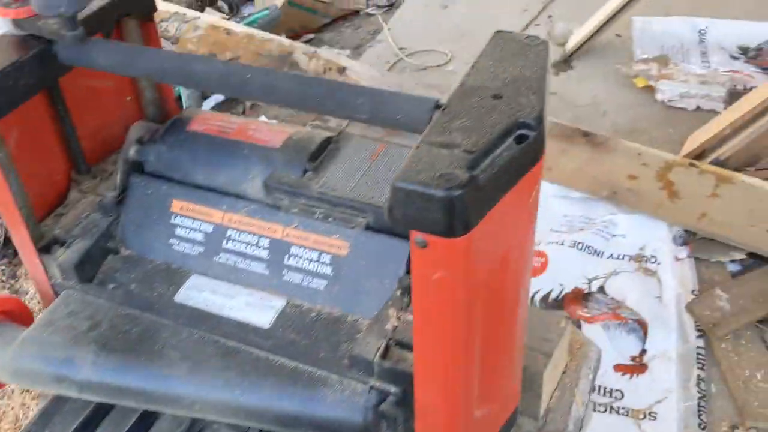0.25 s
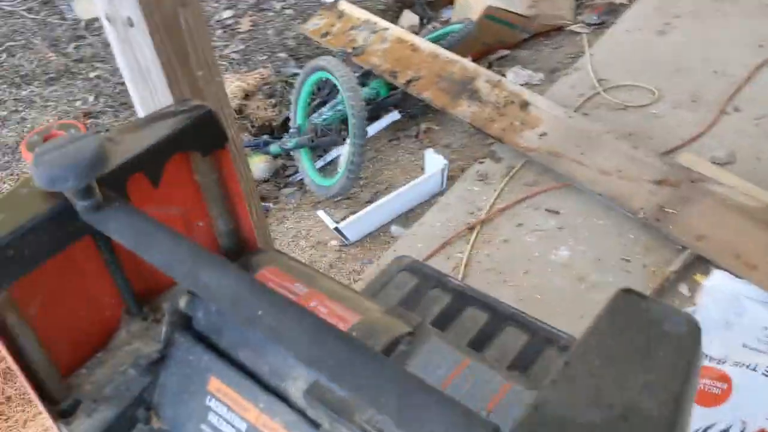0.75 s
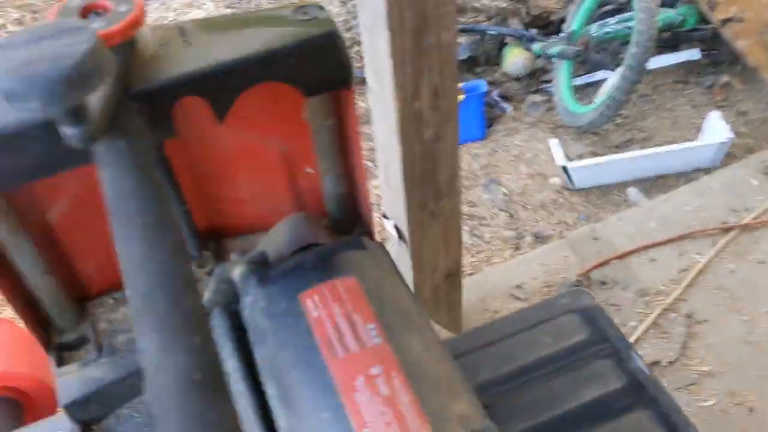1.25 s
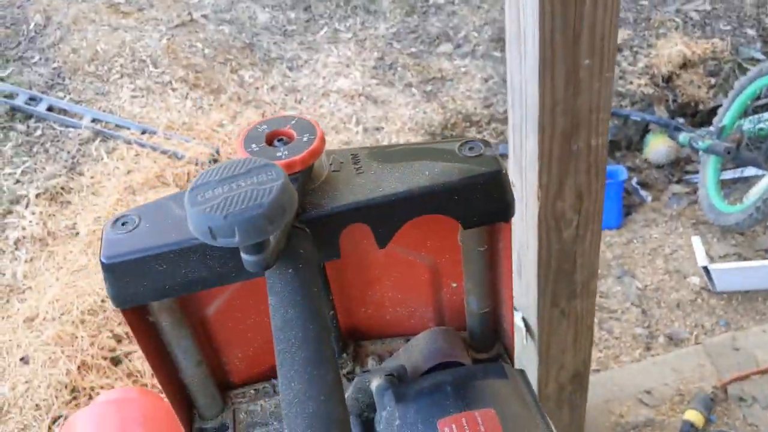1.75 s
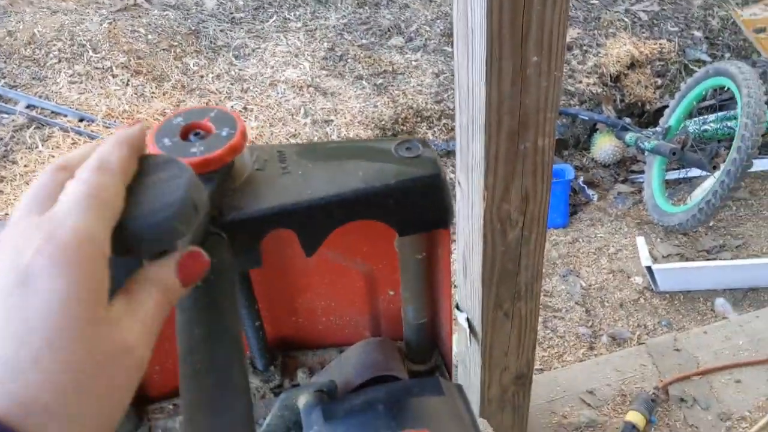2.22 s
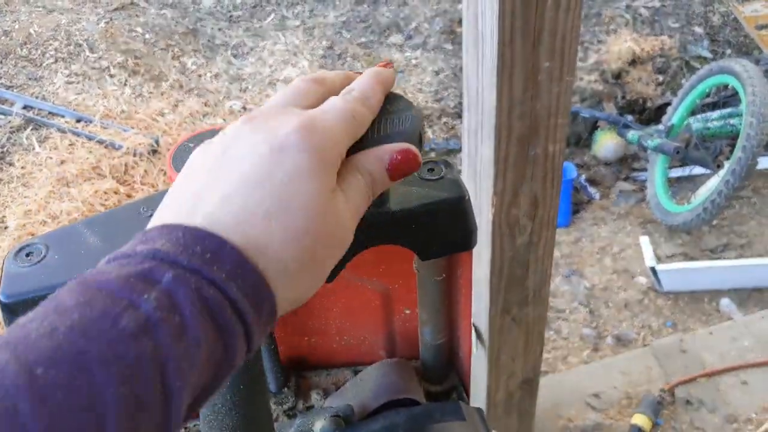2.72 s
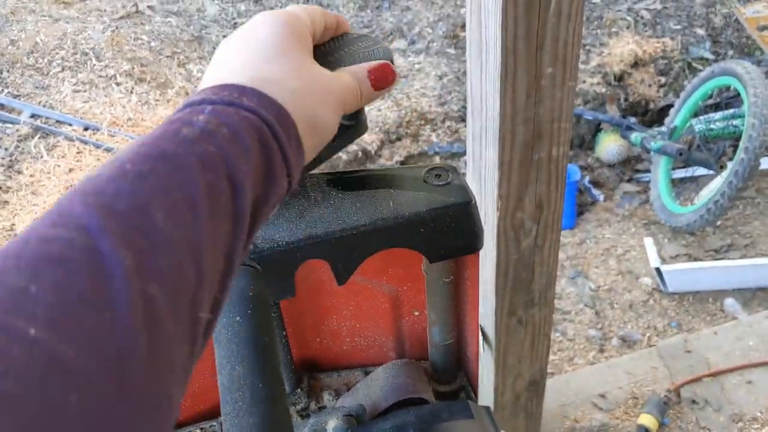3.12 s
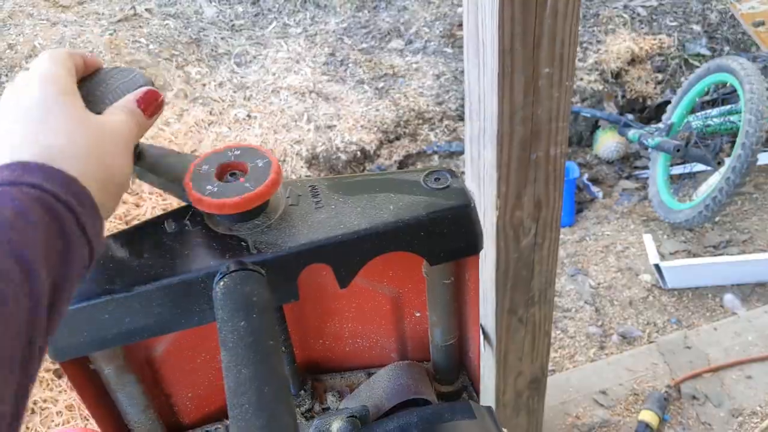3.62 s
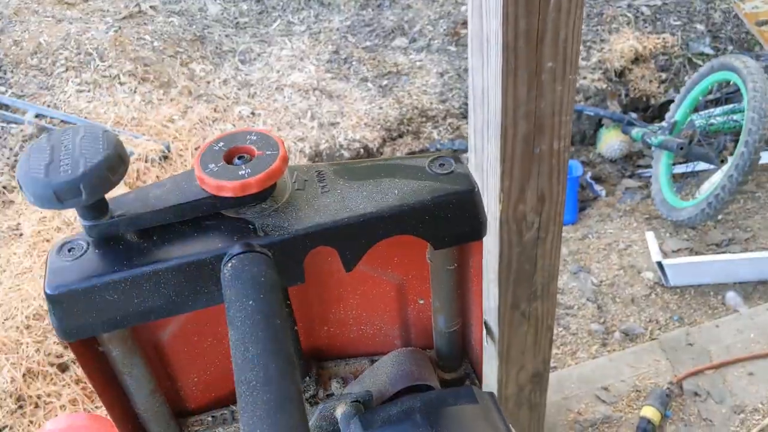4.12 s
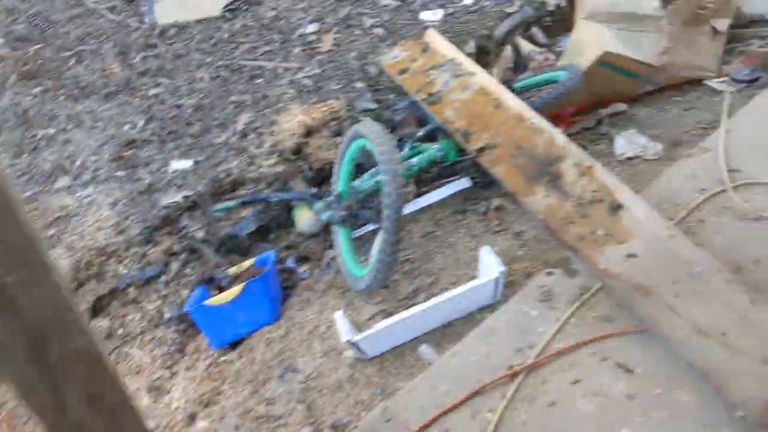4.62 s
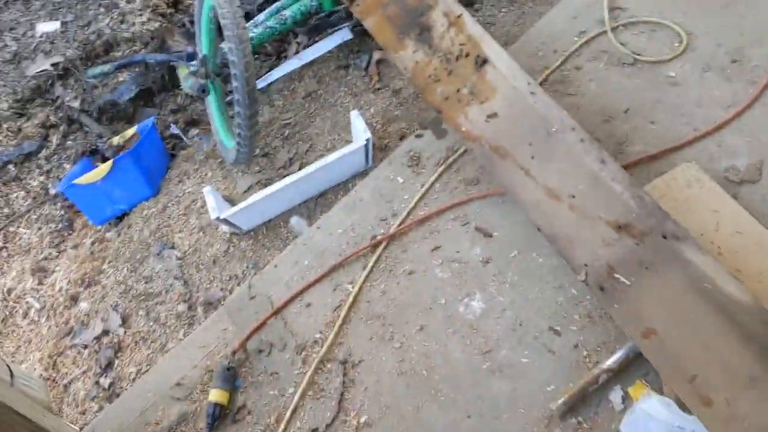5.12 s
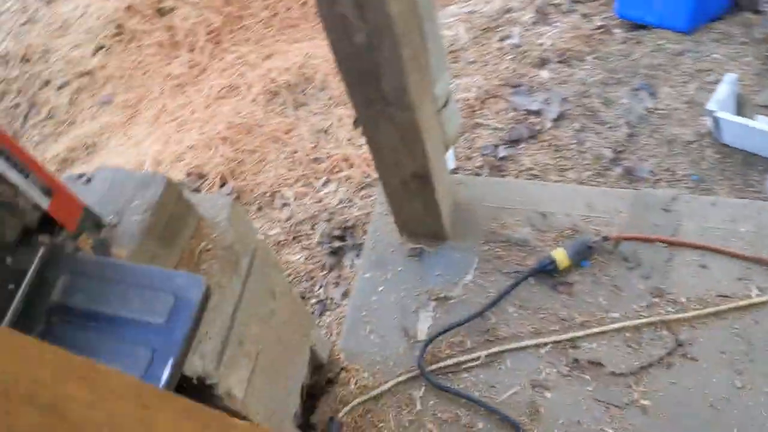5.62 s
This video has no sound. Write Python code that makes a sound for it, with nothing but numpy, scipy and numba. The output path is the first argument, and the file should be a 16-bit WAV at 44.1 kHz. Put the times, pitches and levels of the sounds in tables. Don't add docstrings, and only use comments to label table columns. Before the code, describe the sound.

A benchtop planer idles continuously outdoors, close to a handheld phone in stereo. A low chopping drone, electric whine and broad fan roar begin together; the airy hiss brightens as the phone swings round, grows fuller when it leans in, then the drone thins as it turns away, with soft low wind bumps.

```python
import sys
import numpy as np
from scipy import signal
from scipy.fft import rfft, irfft, next_fast_len
from scipy.io import wavfile
from scipy.ndimage import uniform_filter1d
from numba import njit

SR = 44100
rng = np.random.default_rng(int(sys.argv[2]) if len(sys.argv) > 2 else 0)


def master_out(mix):
    frames = np.transpose(np.atleast_2d(mix))
    ceiling = np.clip(frames, -1, 1)
    pcm = np.round(ceiling * 32767).astype(np.int16)
    wavfile.write(sys.argv[1], SR, pcm)


def ratio_of_db(decibels):
    return 10 ** (np.asarray(decibels, float) / 20)


N = 258426
HOP = 32
STEPS = N // HOP + 2
SIDES = np.array([[1], [-1]])


def curves(table):
    s, *columns = np.transpose(table)
    return [np.interp(np.arange(STEPS) * HOP / SR, s, column) for column in columns]


def fine(x):
    ramp = x[..., :-1, None] + np.diff(x)[..., None] * np.arange(HOP) / HOP
    return ramp.reshape(*x.shape[:-1], -1)[..., :N]


def over_hz(table, hz):
    f, value = np.transpose(table)
    return np.interp(np.log(hz + 1), np.log(f + 1), value)


def unit(x):
    return x / np.sqrt(np.mean(x ** 2))


def walk(rate):
    hold = int(SR / HOP / rate)
    levels = np.repeat(rng.standard_normal(STEPS // hold + 1), hold)[:STEPS]
    return 1.18 * uniform_filter1d(uniform_filter1d(levels, hold), hold)


def swells(rows):
    t = np.arange(STEPS) * HOP / SR
    return sum(db * np.exp(-(2 * (t - s) / length) ** 2) for s, length, db in rows)


# (start [s], end [s])
TURNS = [
    (.44, .52),
    (.92, 1.08),
    (2.2, 2.6),
    (4.55, 4.84),
]


def posed(values):
    held = np.repeat(values, 2)[1:-1]
    return curves(list(zip(np.ravel(TURNS), held)))[0]


# (frequency [Hz], likeness [0-1])
LIKENESS = [(60, 0.2), (130, 0.85), (290, 1), (640, 0.93), (1400, 0.34), (2500, 0.76), (4000, 0.13),
            (8000, 0.12), (15000, 0)]
# (frequency [Hz], left lead [rad])
LEAD = [(0, -0.5), (690, 1), (1210, 0.88), (1890, 0.2), (2760, 4.5), (3360, 8.5), (3620, 9), (4390, 8),
        (5600, 12.5), (6550, 15), (9220, 18.5), (10800, 24.5), (14100, 34), (15400, 17)]


def port_noise(lead=None):
    size = next_fast_len(N)
    hz = np.fft.rfftfreq(size, 1 / SR)
    shared, *own = rfft(rng.standard_normal((3, size)).astype(np.float32))
    like = np.clip(over_hz(LIKENESS, hz), 0, 1)
    if lead is None:
        lead = np.interp(hz, *np.transpose(LEAD))
    together = np.sqrt(like) * shared * np.exp(.5j * lead * SIDES)
    return hz, together + np.sqrt(1 - like) * np.array(own)


WIND_HEARD_DB = (-68, -65, -60.5, -59.5, -76)
# (time [s], length [s], rise [dB])
GUSTS = [(.07, 0.064, 0), (1.3, .25, 3), (2.28, 0.072, 10), (2.39, .08, 7), (2.61, 0.052, 5),
         (3.44, .08, 7), (5.45, .07, 18), (5.86, .1, 18)]


def wind():
    hz, noise = port_noise()
    top_hz, low_hz, gain_db = 100, 30, 3.5
    rumble = irfft(noise / (1 + (hz / top_hz) ** 2) / (1 + low_hz / (hz + 1)))[:, :N]
    return unit(rumble) * fine(ratio_of_db(posed(WIND_HEARD_DB) + swells(GUSTS) + gain_db))


# (frequency [Hz], width [Hz], level [dB])
PANELS = [(358, 24, -55), (451, 23, -49.5), (559, 17, -54), (720, 14, -51)]


def panels():
    hz, noise = port_noise()
    modes = 0
    for centre, width, db in PANELS:
        modes = modes + ratio_of_db(db) / np.sqrt(width) / (1 + (2 * (hz - centre) / width) ** 2)
    pan_db = 4.0
    return irfft(noise * modes)[:, :N] * np.sqrt(SR / 1.6) * ratio_of_db(pan_db / 2 * SIDES)


# (frequency [Hz], left minus right [dB])
BALANCE_DB = [(60, 1), (110, -1), (200, 2.5), (380, 2), (700, 10), (1290, 0), (2380, -6), (4400, -1),
              (8120, 1.5), (15000, -6)]
# (frequency [Hz], # width [Hz], level [dB])
VENTS = [(4400, 490, -45), (5900, 600, -44.5), (10100, 700, -44), (5520, 460, -46.5), (10400, 540, -50),
         (9100, 450, -52), (9200, 1000, -50), (5800, 500, -48.5), (6100, 560, -44), (9500, 1900, -54),
         (11000, 4100, -38.5), (2670, 180, -42), (2080, 410, -36), (2850, 630, -32.5), (2490, 450, -37),
         (2510, 220, -41), (3670, 47, -51.5)]
# (start [s], end [s])
VENT_OPEN = [(1.15, 4.45), (.52, 1.15), (.78, 1.26), (4.75, 5.25), (3.3, 3.53), (3.5, 3.9), (1.3, 1.82),
             (2.45, 2.85), (4.38, 4.58), (2, 4.75), (.58, .72), (1.44, 1.73), (0, .21), (.17, .76),
             (.45, .77), (4.58, 5.15), (0, 4.7)]


def vents():
    hz, noise = port_noise(lead=1.8)
    noise = (noise * ratio_of_db(over_hz(BALANCE_DB, hz) / 2 * SIDES)).astype(np.complex64)
    fade_s, flicker_db = .05, 1.5
    out = 0
    for (start, end), (centre, width, db) in zip(VENT_OPEN, VENTS):
        hump = 1 / (1 + (2 * (hz - centre) / width) ** 2)
        band = irfft((noise * hump).astype(np.complex64))[:, :N] * np.sqrt(SR / width)
        gate = curves([(start - fade_s, 0), (start + fade_s, 1), (end - fade_s, 1), (end + fade_s, 0)])[0]
        out = out + band * fine(gate * ratio_of_db(db + flicker_db * walk(12)))
    return out


# (frequency [Hz], level [dB per Hz])
AIR_COLOUR = [(100, -81.5), (160, -68.5), (250, -58.5), (420, -53), (600, -61.5), (800, -55.5),
              (1200, -55.5), (1500, -60.5), (2200, -56), (3200, -59), (4400, -61.5), (7200, -66),
              (9500, -64), (15500, -74.5)]
AIR_CENTRES_HZ = (200, 1400, 6000, 13000)
AIR_HEARD_DB = [(-2.2, -1, 1, 0.77, 1.5), (-1.2, -0.1, 0.64, 0.26, -1), (-2.5, -0.45, 0.71, 0.19, 0),
                (0.65, 0.28, .5, 1, -2.5)]
# (region [0 low - 3 top], time [s], length [s], change [dB])
SHADOWS = [(0, 4.96, 0.69, -3.5), (1, 5.02, .35, -3), (2, 5.55, 0.23, -4), (3, 4.92, .25, -1.5),
           (3, 1.28, 0.1, -2), (2, 0.18, .4, -1)]


def air():
    hz, noise = port_noise()
    colour_db = over_hz(AIR_COLOUR, hz) + over_hz(BALANCE_DB, hz) / 2 * SIDES
    noise = (noise * ratio_of_db(colour_db)).astype(np.complex64)
    regions = []
    for k, dbs in enumerate(AIR_HEARD_DB):
        regions.append(posed(dbs) + swells([row[1:] for row in SHADOWS if round(row[0]) == k]))
    regions = np.array(regions)
    octave = np.log2(hz + 1).astype(np.float32)
    patchy_db, flicker_db, surge_db = 0.8, 0.99, 0.72
    surge = surge_db * walk(25)
    out = 0
    for centre in np.arange(6.5, 14.1, .4):
        part = np.cos(np.pi / 2 * np.clip(2.5 * (octave - centre), -1, 1)) ** 2
        share = [np.interp(centre, np.log2(AIR_CENTRES_HZ), row) for row in np.eye(4)]
        db = share @ regions + patchy_db * walk(2.92) + flicker_db * walk(14) + surge * (centre > 11)
        out = out + fine(ratio_of_db(db)) * irfft(noise * part)[:, :N]
    return unit(out) * ratio_of_db(-29.5)


@njit
def svf(x, hz, width):
    y, band, low = np.empty(len(x)), 0., 0.
    for i in range(len(x)):
        g = np.tan(np.pi * hz[i] / SR)
        damping = width[i] / hz[i]
        v = (band + g * (x[i] - low)) / (1 + g * (g + damping))
        band = 2 * v - band
        low = low + 2 * g * v
        y[i] = damping * v
    return y


# (time [s], frequency [Hz], level [dB], left minus right [dB])
OUTLET = [(0.78, 2290, -31.5, -10), (1.15, 2380, -35, -8), (1.5, 2310, -38, -7), (2.1, 2277, -33, -8.5),
          (4.45, 2275, -32.5, -6.5), (4.65, 2500, -32.5, -6), (5, 2580, -41, 13), (5.2, 2290, -39.5, -13),
          (5.6, 2400, -40.5, -12), (5.86, 2908, -35, -10)]


def outlet():
    hz, db, pan_db = curves(OUTLET)
    first_s = OUTLET[0][0]
    db = db + curves([(first_s - .04, -30), (first_s, 0)])[0]
    width_hz = fine(np.clip(400 + (hz - 2300), 200, 2000))
    centre_hz = fine(hz)
    noise = irfft(port_noise(lead=1.47)[1])[:, :N] * np.sqrt(SR / width_hz) / 1.24
    hump = np.array([svf(svf(port, centre_hz, width_hz), centre_hz, width_hz) for port in noise])
    gain_db, flicker_db = -2.0, 0.74
    return hump * fine(ratio_of_db(db + gain_db + flicker_db * walk(25) + pan_db / 2 * SIDES))


def tones(shaft_hz, multiples, rows, db_of, flutter_db, rate, smear, sway, scatter=1):
    turn = 2 * np.pi * np.cumsum(shaft_hz) * HOP / SR
    out = 0
    for order, (db, pan_db, lead, follow) in zip(multiples, rows):
        start = scatter * 2 * np.pi * rng.random() + np.pi / 2 * order ** 2
        phase = order * turn + start + smear * np.sqrt(order) * walk(rate)
        lead = lead + sway * np.sqrt(order) * walk(1.4)
        level_db = db + db_of(follow) + flutter_db * walk(rate) + pan_db / 2 * SIDES
        out = out + fine(ratio_of_db(level_db) * np.sqrt(2)) * np.sin(fine(phase + lead / 2 * SIDES))
    return out


# (time [s], frequency [Hz], level [dB])
HUMS = [
    [(0, 361, -38), (.5, 360.4, -36.5), (1, 364, -37.5), (2, 370, -41.5), (3, 368.7, -43.5),
     (4.5, 368.5, -39.5), (4.75, 363, -36.5), (5.1, 360, -36), (5.86, 358, -37)],
    [(0, 375.6, -38), (.6, 379, -46), (1.1, 381.6, -43), (2.3, 384.5, -40), (2.7, 386, -48),
     (3.8, 384, -52), (4.1, 385.7, -41), (4.55, 384.5, -44), (4.85, 377.3, -42), (5.3, 374.4, -41.5),
     (5.86, 376, -38)],
    [(0, 351.1, -50), (.9, 354.7, -48), (1.1, 330.4, -57), (2, 320.5, -54), (4.4, 322, -50),
     (4.7, 338, -47), (5.3, 333.3, -49), (5.86, 329, -50)],
]


def hum():
    out = 0
    for hz, db in map(curves, HUMS):
        smear = .15 + .04 * posed(SHAKE)
        out = out + tones(hz, [1], [(1.06, 1.2, .1, 0)], lambda _: db,
                          flutter_db=1.25, rate=20, smear=smear, sway=0.23)
    return out


# (time [s], shaft frequency [Hz])
SPEED = [(0, 169.4), (.5, 170.4), (1.1, 171.2), (2, 171.6), (3.5, 172), (4.5, 171.9), (5.86, 172.9)]
MOTOR_MULTIPLES = (2, 7, 9, 10, 12, 13, 14, 16, 18, 25, 30, 31, 32, 35)
# (level [dB], left minus right [dB], left lead [rad], share of the swells it follows [0-1+])
MOTOR_ORDERS = [(-6, 9, 1.5, 0), (0.5, -6, 2, 0.4), (5, -3.5, -1.85, 1.37), (-9, 4, 0.5, 0.39),
                (-9.5, -5, 0, 0.033), (-7.5, 12, 2, 0.0018), (-10, -2, -1, 0.38), (-6, 4, 2.5, .2),
                (-8, 11, 2, 0.34), (-9, 2, 4, 0), (-21, -16, -4, .2), (-12.5, -5, 1, 0.057),
                (-9.5, -13, 4, 0.82), (-22, -3, 1, .2)]
# (time [s], length [s], rise [dB])
WHINE_SWELLS = [(.3, .5, 6.5), (.7, 0.19, 6.5), (1.07, 0.41, 7.5), (1.27, 0.078, 7), (1.45, .3, -1),
                (2.15, .3, 5), (2.6, .65, 10), (3.3, 0.38, 5), (3.8, 0.41, 8), (4.1, 0.24, 3.5),
                (4.56, .16, 8.5), (5.16, 0.18, -9), (5.72, .2, -1.5)]


def motor():
    belt_ratio = 2.134
    hz = belt_ratio * curves(SPEED)[0]
    db = -49.5 + swells(WHINE_SWELLS)
    return tones(hz, MOTOR_MULTIPLES, MOTOR_ORDERS, lambda share: db.mean() + share * (db - db.mean()),
                 flutter_db=2.5, rate=40, smear=0.26, sway=0.077)


HEAD_MULTIPLES = (1, 2, 3, 4, 5, 6, 7, 8, 9, 10, 11)
# (left minus right [dB], left lead [rad])
HEAD_ORDERS = [(1.5, -0.78), (1.7, -0.041), (-1, 0.41), (0.5, -0.073), (-4.5, -0.16), (0, -0.38),
               (13.5, 1.76), (-1, 0.71), (4, -0.33), (4, 0.85), (-7, 1.4)]
HEAD_HEARD_DB = [(-59.5, -57.5, -50.5, -51.5, -80), (-33, -33, -28, -27.5, -45),
                 (-42.5, -41, -39, -36.5, -42), (-41.5, -38, -30, -29, -46), (-52, -43.5, -43, -44, -42.5),
                 (-35.5, -52, -35.5, -35, -40.5), (-48, -44, -49, -46.5, -49), (-65, -58, -60, -65, -61),
                 (-54, -58, -53, -54, -58), (-60, -52, -47, -47, -61), (-54, -43.5, -45.5, -43, -51.5)]
# (multiple, time [s], length [s], change [dB])
GLINTS = [(11, 0.91, 0.17, 4), (11, 5.45, .4, 10), (11, 4.25, .5, 3), (4, 4.58, .2, 3.5),
          (4, 5.1, 0.34, -13), (4, 0.23, 0.15, -9), (8, .15, .4, 12), (6, 5.15, 0.18, -5),
          (3, 0.47, .1, -7), (1, 1.72, .2, -10), (7, 5.75, 0.17, 3), (2, .3, 0.19, 2), (2, 4.47, 0.22, -4),
          (3, 3.6, .5, 2), (6, 4.8, .4, -9)]
SHAKE = (1.7, 3.8, .7, 0.77, 5)


def cutter_head():
    shake = posed(SHAKE)
    rows = []
    for k, dbs, ports in zip(HEAD_MULTIPLES, HEAD_HEARD_DB, HEAD_ORDERS):
        glint = swells([row[1:] for row in GLINTS if round(row[0]) == k])
        heard_db = posed(dbs) + glint + 0.46 * shake * walk(6)
        rows.append((0, *ports, heard_db))
    return tones(*curves(SPEED), HEAD_MULTIPLES, rows, lambda db: db,
                 flutter_db=0.35, rate=18, smear=0.07 * shake, sway=0.12, scatter=0)


def scene():
    return wind() + panels() + vents() + air() + outlet() + hum() + motor() + cutter_head()


def band_limit(x):
    return signal.sosfilt(signal.butter(12, 15870, fs=SR, output="sos"), x)


def record(dry):
    drive, top_hz, treble_hz = 3.5, 15730, 2500
    hz = np.fft.rfftfreq(N, 1 / SR)
    spectrum = rfft(np.tanh(drive * dry) / drive) * (hz < top_hz)
    treble = irfft(spectrum / (1 + (treble_hz / (hz + 1)) ** 4), N)
    wave = np.cos(2 * np.pi * (np.arange(N) - 222) / 1024 + .1)
    return band_limit(irfft(spectrum, N) + 0.17 * wave * treble)


dry = scene()
out = record(dry)
master_out(out)
```